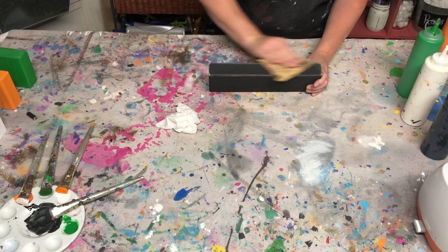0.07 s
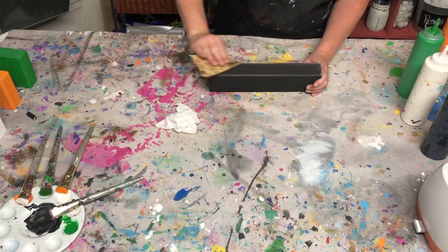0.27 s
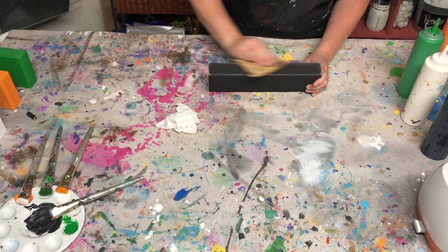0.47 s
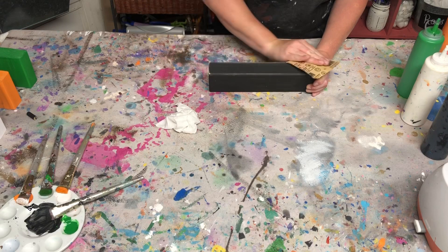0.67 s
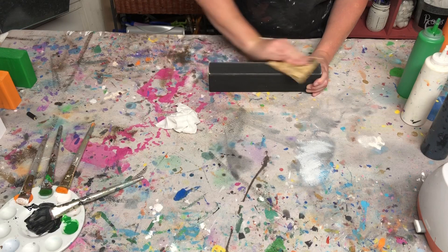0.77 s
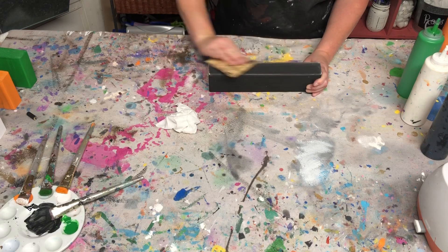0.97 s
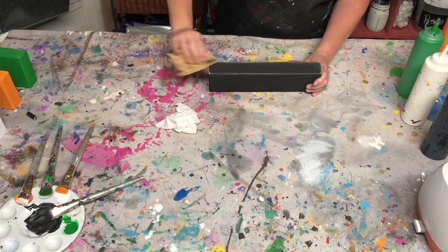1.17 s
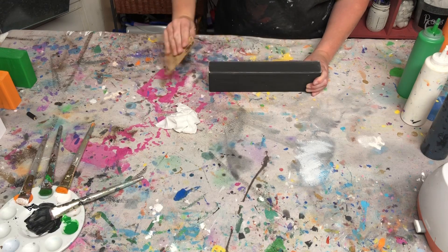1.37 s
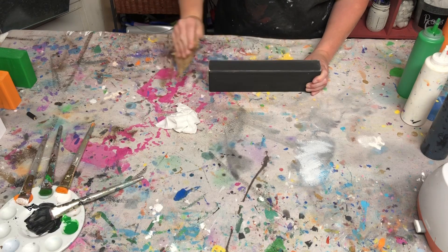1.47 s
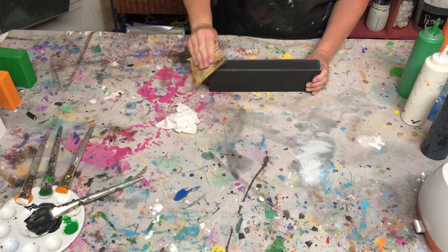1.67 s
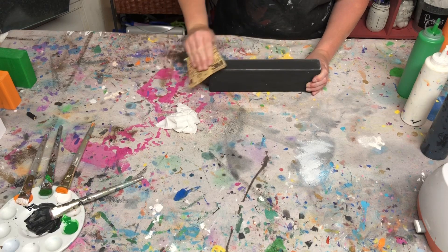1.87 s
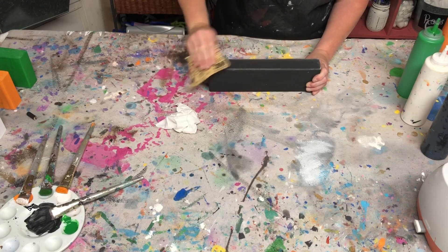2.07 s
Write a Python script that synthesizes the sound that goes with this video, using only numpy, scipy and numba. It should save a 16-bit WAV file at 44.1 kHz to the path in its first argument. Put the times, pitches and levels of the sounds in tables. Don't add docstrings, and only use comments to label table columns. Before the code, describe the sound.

Sandpaper scrapes along a painted wood block in three long gritty strokes, pauses with faint rustle and small snaps, then rasps quickly at the corner, over low ventilation rumble, recorded close in a small room.

```python
import sys
import numpy as np
from scipy import signal
from scipy.fft import rfft, irfft
from scipy.io import wavfile
from numba import njit

SR = 44100
rng = np.random.default_rng(int(sys.argv[2]) if len(sys.argv) > 2 else 0)


def persist_wave(psi):
    counts = np.round(np.clip(psi, -1, 1) * 32767).astype(np.int16)
    wavfile.write(sys.argv[1], SR, np.atleast_2d(counts).T)


def volts_from_db(level):
    exponent = np.asarray(level, float) / 20
    return 10 ** exponent


N = 93756

# [t/s, pressure level/dB, block ring level/dB, sheet hiss level/dB]
STROKES = [
    [(0.012, -47.5, -3, -8), (0.054, -33, -4.5, 0), (0.094, -26, -14.5, -0.5), (0.274, -30.5, -8.5, 1),
     (0.33, -36.5, -2.5, -3), (0.354, -56, 6, 2), (0.37, -57, 8, -14)],
    [(0.37, -51.5, 0.5, -5), (0.436, -30, -10, 0.5), (0.622, -26.5, -17.5, 0), (0.68, -40.5, -6, -0.5),
     (0.702, -58.5, -1, 5), (0.72, -59, -5, 0)],
    [(0.72, -62, 1, 1), (0.75, -41.5, 1, -10), (0.794, -27, -14, -4), (0.854, -29, -10, -3.5),
     (0.89, -25, -11.5, -5.5), (0.96, -29.5, -7.5, 1)],
    [(0.97, -30, -5.5, -0.5), (1.068, -31.5, 0, 1), (1.142, -36, -1, -2.5), (1.188, -34, 0, -4.5),
     (1.228, -47.5, -6, 2.5), (1.27, -80, -7, 8)],
]
# [t/s, place from 0 held end to 1 free end]
PLACE = [(0, 0.0), (.09, .08), (.2, .55), (.35, .8), (.44, .75), (.58, .3), (.7, 0.02), (.8, .15),
         (.9, .35), (1.1, .65), (1.22, 1.0)]
# [f at held end/Hz, f at free end/Hz, width/Hz, held level/dB, free level/dB]
HOLLOWS = [(2590, 3290, 380, 8, 9), (3840, 5100, 266, 11.5, 7), (5260, 6470, 740, 1.5, 4),
           (7950, 7800, 460, 10, -15)]
# [f at held end/Hz, f at free end/Hz, width/Hz, held level/dB, free level/dB]
BLOCK_RINGS = [(1010, 1504, 340, 1, 2), (1310, 2110, 490, 1.5, 0.5), (490, 700, 430, 1.4, -2)]
# [t/s, level/dB]
CUPPING = [(.05, 0), (.1, -1), (.15, 0.5), (.19, -2.5), (.23, -2), (0.302, 2.3), (.45, .1), (0.529, 3),
           (.57, -1), (.62, 1.5), (.79, -2.5), (.85, -1), (.92, -0.5), (.97, 0.5), (1.08, -1.2),
           (1.182, 0.5)]
# [t/s, level/dB]
HOLDING = [(.05, .1), (.14, -2.5), (.22, -1), (0.299, -0.9), (.45, -0.5), (0.551, 4.5), (.65, -3.9),
           (.77, 5), (.85, -1.5), (.95, -0.5), (1.021, -1.5), (1.08, -1), (1.125, -4.5), (1.145, -3.5),
           (1.2, -0.5)]
# [f/Hz, level/dB per Hz]
EDGE_SPECTRUM = [(150, -52), (250, -9.5), (875, -10.5), (980, -9), (1210, -4), (2890, -5.5), (7500, -8.5),
                 (9750, -18), (16500, -120)]
# [f/Hz, level/dB per Hz]
SHEET_SPECTRUM = [(3240, -10.5), (5500, -4), (7120, -3), (8400, -2), (11800, -3.5), (15600, -8.5)]

# [t/s, pressure level/dB, bite level/dB]
FLICKS = [
    [(1.672, -72, -5), (1.692, -33, -3), (1.726, -42.5, -8), (1.756, -64, -13)],
    [(1.766, -64, -6), (1.788, -42.5, 4.5), (1.8, -39.5, -0.5), (1.84, -61.5, -15)],
    [(1.842, -60, -14), (1.862, -39.5, -2), (1.884, -36.5, -5), (1.917, -56, -18)],
    [(1.918, -71, -12), (1.93, -38, -3), (1.95, -40.5, -8), (1.962, -30, -4.5), (1.976, -32.5, -1.5),
     (2.006, -58, -15)],
    [(2.008, -59, -12), (2.026, -37, -8), (2.064, -33, -19), (2.1, -54.5, -17)],
    [(2.102, -69, -25), (2.114, -35, -16), (2.126, -37, -10)],
]
# [f/Hz, level/dB per Hz]
CORNER_SPECTRUM = [(410, -39), (700, -1), (1120, -11), (1530, -2.5), (3200, -3), (3840, -8.5), (4260, -9),
                   (12200, -11), (15600, -18)]
# [f/Hz, width/Hz, level/dB]
CORNER_RINGS = [(1550, 28, 6.5), (2400, 73, -24), (4250, 230, 8.5), (5280, 130, 13), (7100, 250, -6)]
# [ratio to the bite pitch, level/dB]
BITE_RINGS = [(.86, -7), (1, 4)]
# [t/s, f/Hz]
BITE_PITCH = [(1.69, 3370), (1.73, 3300), (1.79, 3000), (1.81, 3050), (1.87, 3250), (1.94, 3200),
              (1.962, 2780), (1.978, 3200), (2.03, 3200), (2.065, 3280), (2.12, 3180)]
# [t/s, level/dB, half width/s]
SHAKES = [(1.7, -47, 0.017), (1.808, -38, 0.011), (1.882, -38, 0.016), (1.948, -36, .009),
          (1.975, -42, 0.01), (2.054, -37.5, 0.018), (2.122, -38.5, 0.0091)]
# [f/Hz, width/Hz, level/dB]
TABLE_RINGS = [(279, 68, 3), (360, 67, 2), (436, 68, 4), (560, 86, -5), (740, 260, -16.5)]

# [f/Hz, level/dB per Hz]
SCUFF_SPECTRUM = [(500, -9), (1200, -1), (2400, 3.5), (4000, -12), (6500, -10), (12000, -18)]
# [t/s, peak level/dB, f/Hz, time to fall 60 dB/s]
SNAPS = [(1.2044, -26, 1700, .006), (1.211, -29, 850, 0.013), (1.21, -34, 1680, 0.0055),
         (1.3155, -40, 2100, .006), (1.3157, -43, 1650, .008), (1.3153, -44, 3000, .004),
         (1.245, -59, 1773, 0.4), (1.5133, -23, 12000, .0015), (1.5132, -36, 6000, .003),
         (1.514, -21, 13500, .0015), (1.514, -25, 9300, .0015), (1.5136, -30, 16000, .0015),
         (1.6312, -22, 1990, 0.0043), (1.6312, -38, 4950, 0.0034), (1.6314, -36, 9600, .002),
         (1.634, -34, 585, 0.057), (1.6312, -37, 7800, .002), (1.6312, -39, 11000, .002),
         (1.6312, -36, 3200, .002), (2.014, -27, 190, .05)]
# [t/s, level/dB]
CARRY = [(1.25, -67), (1.3, -65), (1.38, -68), (1.44, -65), (1.49, -70), (1.54, -78), (1.6, -87)]
# [f/Hz, level/dB per Hz]
RUSTLE_SPECTRUM = [(4500, -1), (5500, -2), (7300, -24), (9000, -1), (12500, 0), (14500, -8)]
# [t/s, pressure (1 = full scale), half width/s]
PUSHES = [(0.027, 0.48, 0.061), (.21, -0.23, 0.062), (.37, -0.069, 0.1), (0.527, 0.14, 0.028),
          (.59, -0.083, 0.071), (0.768, 0.46, 0.067), (0.934, -0.33, 0.077), (1.142, 0.11, 0.02),
          (1.38, 0.076, 0.013), (1.46, -0.07, 0.017), (1.66, 0.064, 0.042), (1.841, -0.24, 0.027),
          (1.93, 0.18, 0.018), (2.053, 0.21, 0.027)]
# [f/Hz, level/dB per Hz]
RUMBLE_SPECTRUM = [(8.2, -61), (14, 12), (64, -11.5), (107, -9.5), (150, -3.5), (190, -9.5), (215, -18.5),
                   (261, -22.5), (322, -20.5), (345, -25.5), (900, -32.5), (1170, -74), (1980, -120)]
# [f/Hz, width/Hz, level/dB]
ROOM_TONES = [(101, 14, -1), (154.4, 12, 6), (184.8, 11, 4)]
# [f/Hz, level/dB per Hz]
AIR_SPECTRUM = [(410, -33), (700, -1), (757, -6), (994, -6), (1270, -9.5), (1390, -13), (3740, -22),
                (12400, -22), (15600, -28)]

EDGE_GRAINS_PER_S, CORNER_GRAINS_PER_S = 30000, 9000
TIME = np.arange(N) / SR


def follow(times, values, **ends):
    return np.interp(TIME, times, values, **ends)


def rms_one(x):
    return x / np.sqrt(np.mean(x ** 2) + 1e-20)


def drift(rate_hz):
    r = np.exp(-2 * np.pi * rate_hz / SR)
    noise = rng.standard_normal(N + SR)
    smooth = signal.lfilter([1], [1, -2 * r, r * r], noise)
    return rms_one(smooth[SR:])


def colour(x, spectrum):
    hz, db = np.transpose(spectrum)
    hz_points = np.r_[hz[0] / 2, hz, hz[-1] * 2]
    db_points = np.r_[db[0] - 30, db, db[-1] - 30]
    f = np.arange(1, N // 2 + 2) * SR / N
    gain = volts_from_db(np.interp(np.log(f), np.log(hz_points), db_points))
    return rms_one(irfft(rfft(x) * gain, N))


def resonate(x, rings):
    out = 0
    for k, (hz, width_hz, db) in enumerate(rings):
        r = np.exp(-np.pi * width_hz / SR)
        feed = (1 - r * r) / 2 * np.array([1, 0, -1])
        back = [1, -2 * r * np.cos(2 * np.pi * hz / SR), r * r]
        out = out + (-1) ** k * volts_from_db(db) * signal.lfilter(feed, back, x)
    return out


@njit
def slide(x, a1, r2):
    y = np.zeros(len(x))
    for n in range(2, len(x)):
        y[n] = (1 - r2) / 2 * (x[n] - x[n - 2]) + a1[n] * y[n - 1] - r2 * y[n - 2]
    return y


def sliding(x, rings, grip):
    grip_db = follow(*np.transpose(grip))
    place = follow(*np.transpose(PLACE))
    out = 0
    for k, (held_hz, free_hz, width_hz, held_db, free_db) in enumerate(rings):
        sign = (-1) ** k
        r = np.exp(-np.pi * width_hz / SR)
        w = 2 * np.pi * (held_hz + place * (free_hz - held_hz)) / SR
        place_db = held_db + place * (free_db - held_db)
        patchy_db = 0.6 * drift(14)
        gain = volts_from_db(place_db + sign * grip_db + patchy_db)
        out = out + sign * gain * slide(x, 2 * r * np.cos(w), r * r)
    return out


def grit(grains_per_s):
    spread_db = 1.5 * np.minimum(rng.exponential(1, N), 5)
    sizes = volts_from_db(spread_db) * rng.standard_normal(N)
    catches = rng.random(N) < grains_per_s / SR
    return rms_one(sizes * catches)


def long_strokes():
    t, *columns = np.vstack(STROKES).T
    level_db, block_db, sheet_db = [follow(t, column) for column in columns]
    level_db[int(t[-1] * SR):] = -120
    direct = grit(EDGE_GRAINS_PER_S)
    hollows = sliding(grit(EDGE_GRAINS_PER_S), HOLLOWS, CUPPING)
    edge = colour(direct + hollows, EDGE_SPECTRUM) * volts_from_db(0.55 * drift(25.0))
    block = rms_one(sliding(grit(EDGE_GRAINS_PER_S), BLOCK_RINGS, HOLDING))
    block = block * volts_from_db(block_db + 0.68 * drift(7.0))
    sheet = colour(grit(EDGE_GRAINS_PER_S), SHEET_SPECTRUM) * volts_from_db(sheet_db + 0.48 * drift(35.0))
    return volts_from_db(level_db) * (edge + block + sheet)


def corner_flicks():
    t, level_db, bite_db = np.vstack(FLICKS).T
    pressure = volts_from_db(follow(t, level_db, left=-120))
    snaps = grit(CORNER_GRAINS_PER_S)
    rasp = colour(snaps + resonate(snaps, CORNER_RINGS), CORNER_SPECTRUM) * volts_from_db(0.4 * drift(90.0))
    w = 2 * np.pi * follow(*np.transpose(BITE_PITCH)) / SR
    r = np.exp(-np.pi * 290 / SR)
    bite = 0
    for ratio, db in BITE_RINGS:
        bite = bite + volts_from_db(db) * slide(snaps, 2 * r * np.cos(ratio * w), r * r)
    return pressure * (rasp + volts_from_db(follow(t, bite_db)) * rms_one(bite))


def table_shake():
    white = rng.standard_normal(N)
    jolts = sum(volts_from_db(db) * np.exp(-.5 * ((TIME - at) / width) ** 2) for at, db, width in SHAKES)
    return resonate(jolts * white, TABLE_RINGS) / np.std(resonate(white, TABLE_RINGS))


def scuff():
    since = TIME - 1.6325
    level_db = -36 - 60 * np.abs(since) / .045
    return colour(grit(CORNER_GRAINS_PER_S), SCUFF_SPECTRUM) * volts_from_db(level_db) * (since > 0)


def lone_snaps():
    out = np.zeros(N + SR)
    t = np.arange(SR // 2) / SR
    for start, db, hz, t60 in SNAPS:
        fade = volts_from_db(db - 60 * t / t60)
        onset = 1 - np.exp(-t * hz)
        out[int(start * SR):][:len(t)] += fade * onset * np.sin(2 * np.pi * hz * t)
    return out[:N]


def rustle():
    level_db = follow(*np.transpose(CARRY), left=-120, right=-120)
    return colour(rng.standard_normal(N), RUSTLE_SPECTRUM) * volts_from_db(level_db + 1.5 * drift(15.0))


def air_pushes():
    return sum(size * np.exp(-.5 * ((TIME - at) / width) ** 2) for at, size, width in PUSHES)


def room(x):
    t = np.arange(SR // 2) / SR
    dull = signal.lfilter([1], [1, -.6], rng.standard_normal(len(t)))
    tail = dull * volts_from_db(-60 * t / 0.31) * (t > .004)
    return volts_from_db(-25) * signal.fftconvolve(x, tail / np.sqrt(np.sum(tail ** 2)))[:N]


def ventilation():
    low, high = rng.standard_normal((2, N))
    rumble = colour(low + resonate(low, ROOM_TONES), RUMBLE_SPECTRUM) * volts_from_db(-30.5 + .4 * drift(6.0))
    hum = volts_from_db(-43) * np.sqrt(2) * np.sin(2 * np.pi * 120.2 * TIME)
    hiss = colour(high, AIR_SPECTRUM) * volts_from_db(-59.5 + 0.27 * drift(12.0))
    return rumble + hum + hiss


def scene():
    work = long_strokes() + corner_flicks() + table_shake() + scuff() + lone_snaps() + rustle()
    mix = work + room(work) + air_pushes() + ventilation()
    return np.tile(mix, (2, 1))


def band_limit(x):
    return signal.sosfilt(signal.butter(12, 15770, fs=SR, output="sos"), x)


def record(dry):
    return band_limit(dry)


dry = scene()
out = record(dry)
persist_wave(out)
```